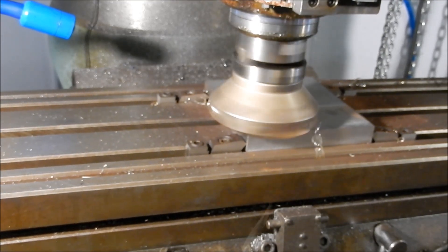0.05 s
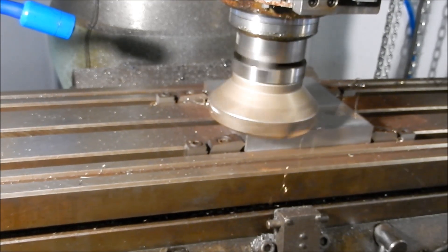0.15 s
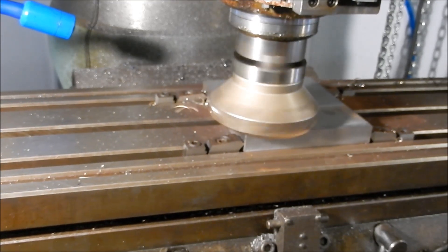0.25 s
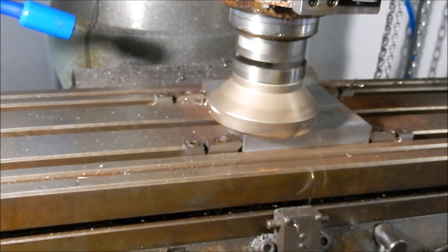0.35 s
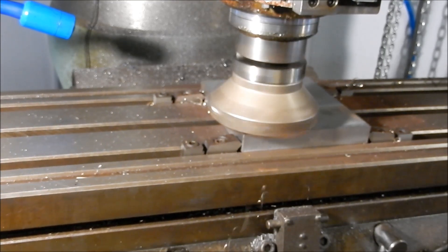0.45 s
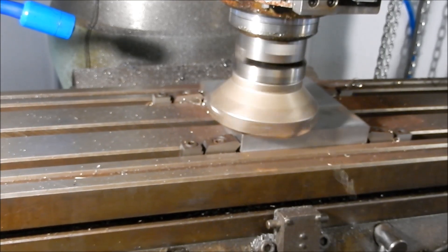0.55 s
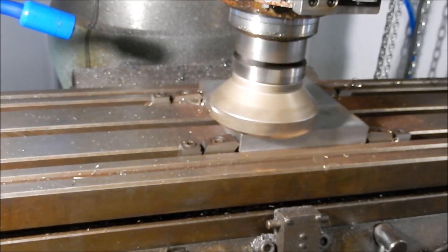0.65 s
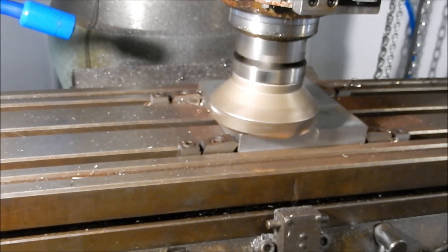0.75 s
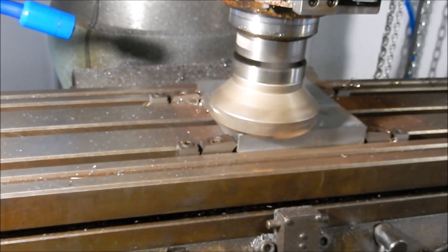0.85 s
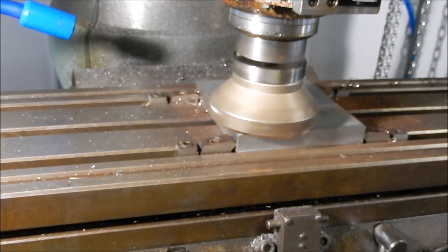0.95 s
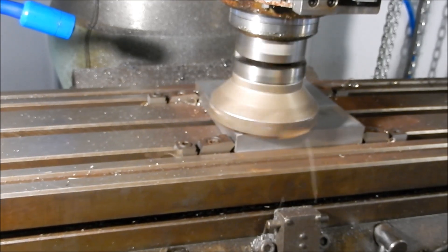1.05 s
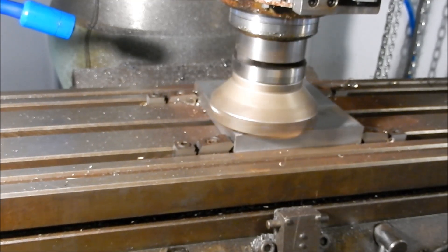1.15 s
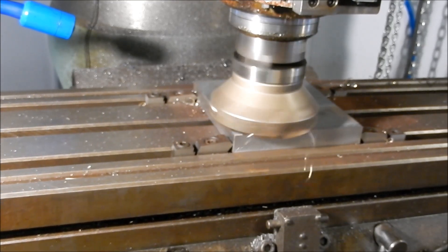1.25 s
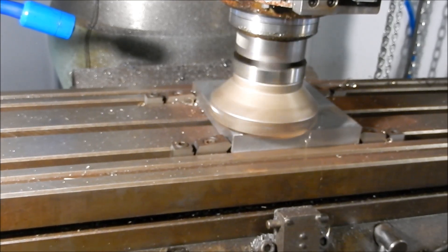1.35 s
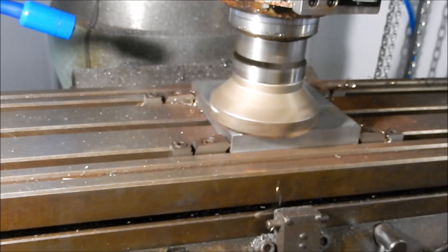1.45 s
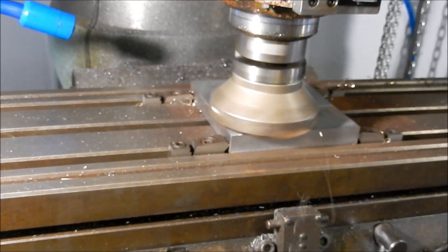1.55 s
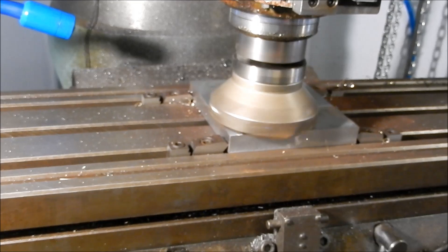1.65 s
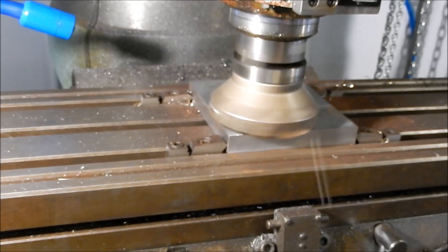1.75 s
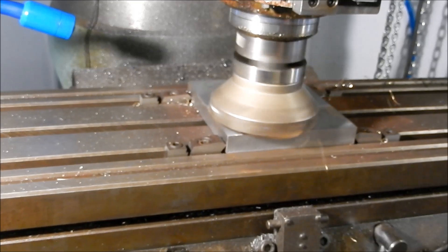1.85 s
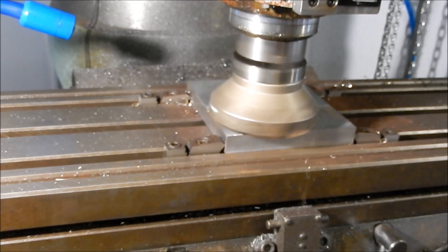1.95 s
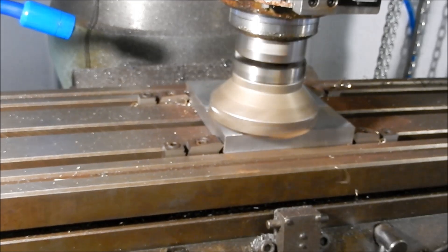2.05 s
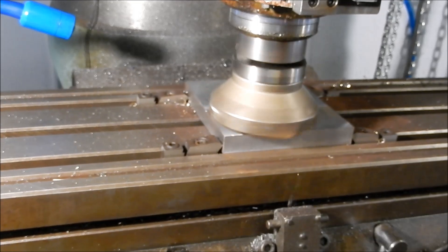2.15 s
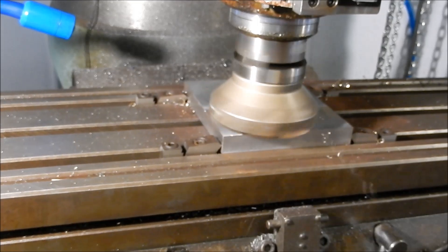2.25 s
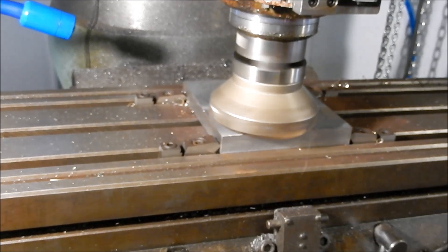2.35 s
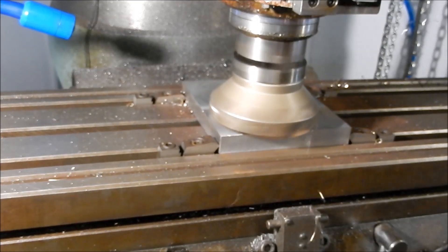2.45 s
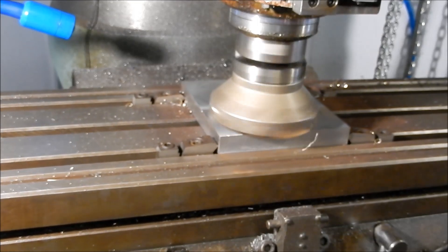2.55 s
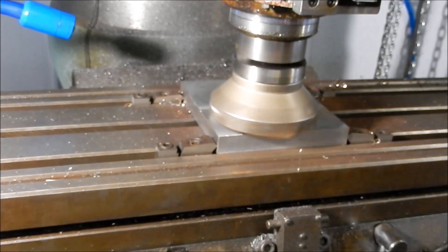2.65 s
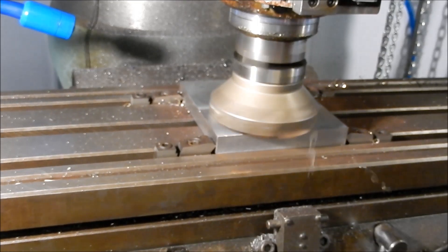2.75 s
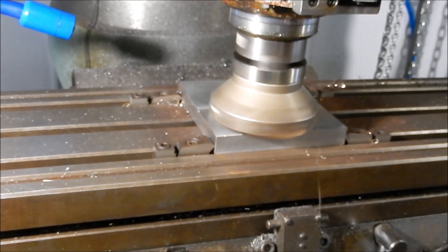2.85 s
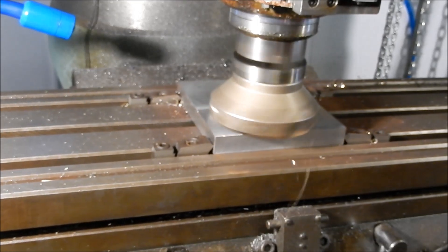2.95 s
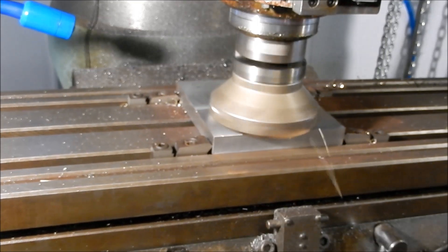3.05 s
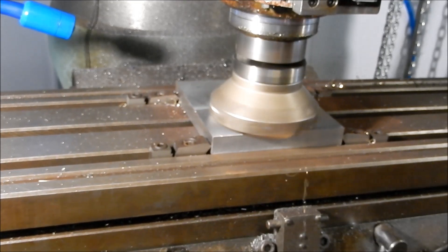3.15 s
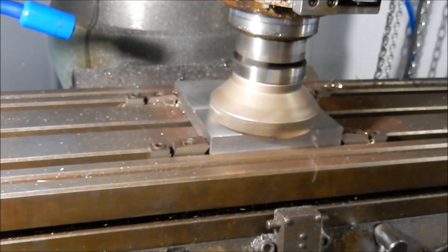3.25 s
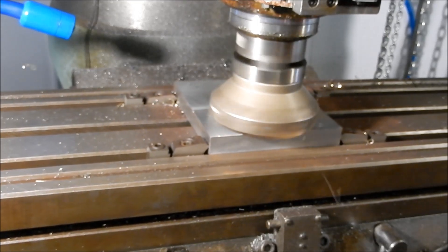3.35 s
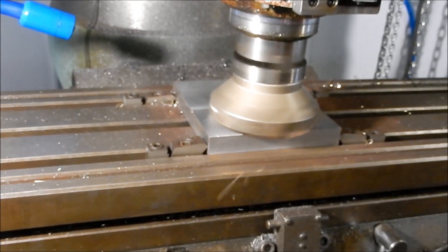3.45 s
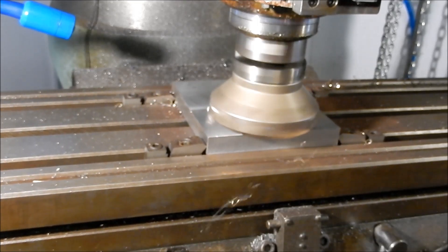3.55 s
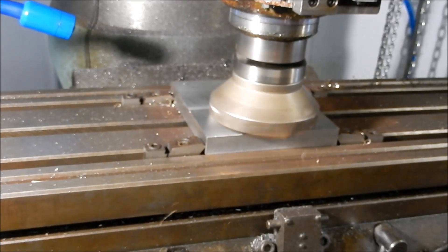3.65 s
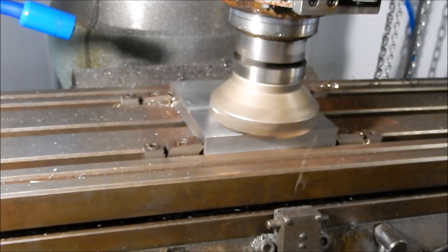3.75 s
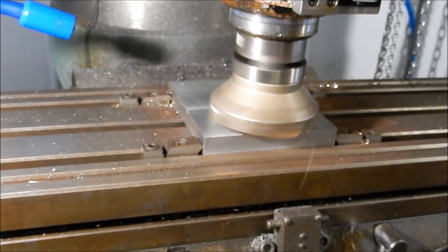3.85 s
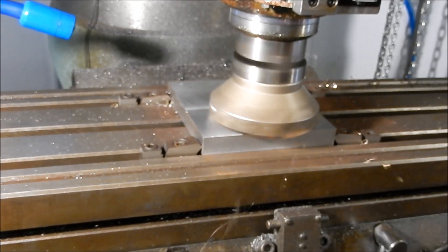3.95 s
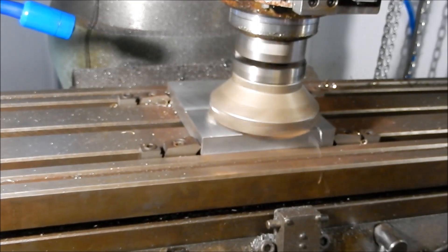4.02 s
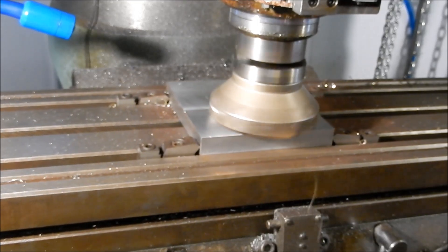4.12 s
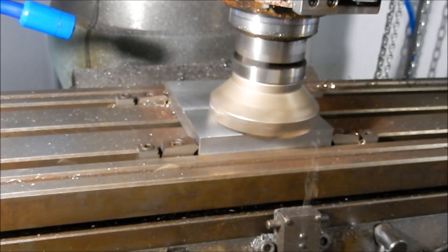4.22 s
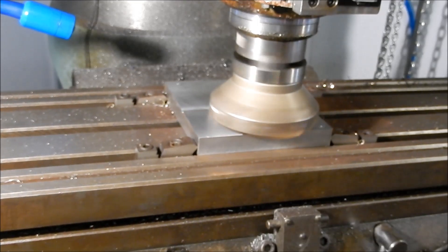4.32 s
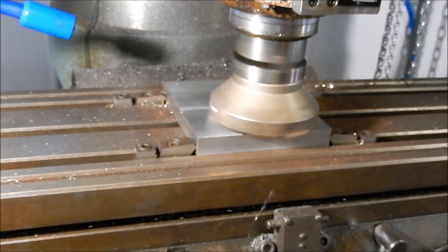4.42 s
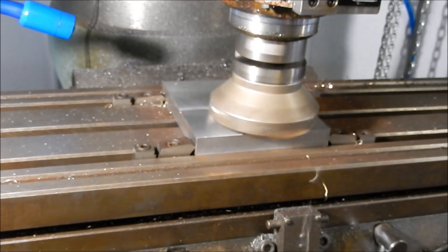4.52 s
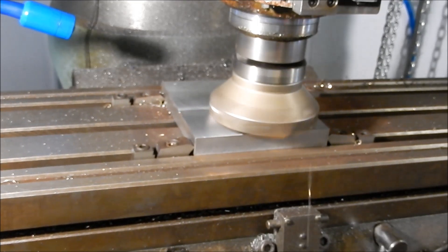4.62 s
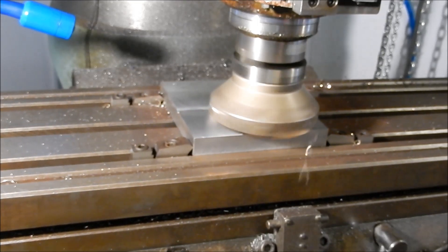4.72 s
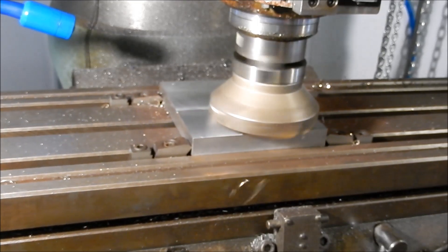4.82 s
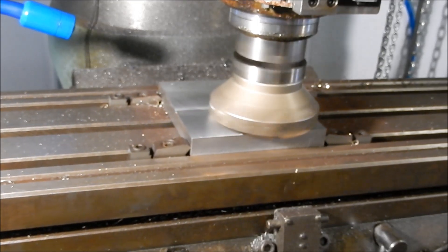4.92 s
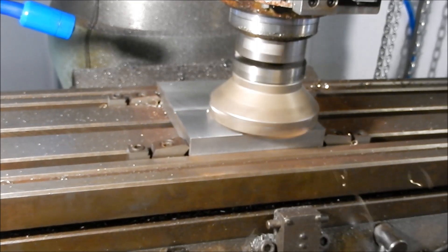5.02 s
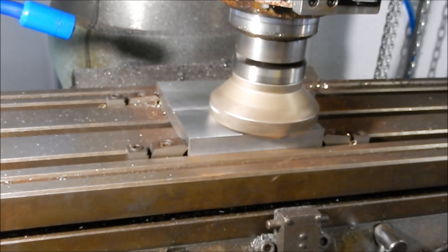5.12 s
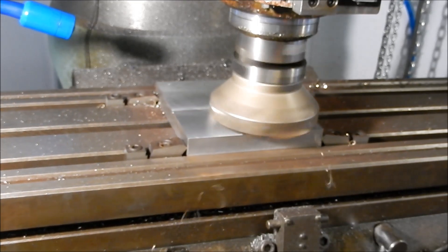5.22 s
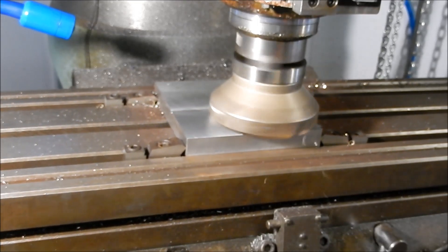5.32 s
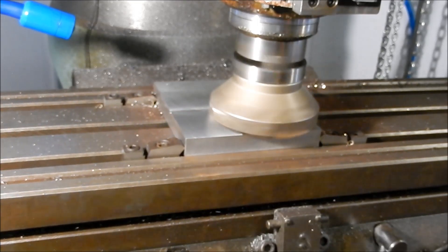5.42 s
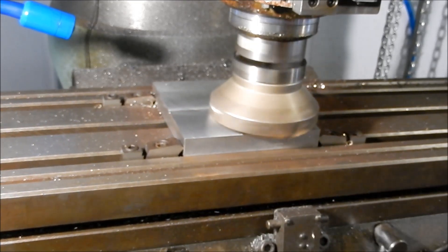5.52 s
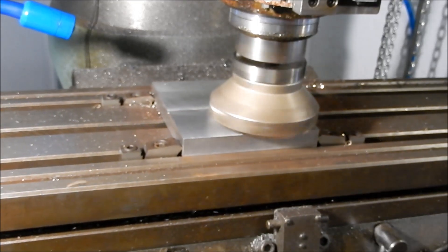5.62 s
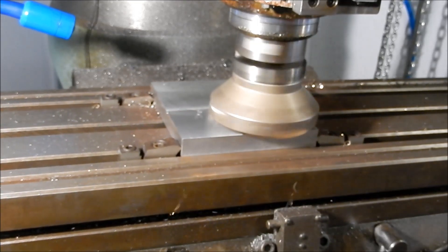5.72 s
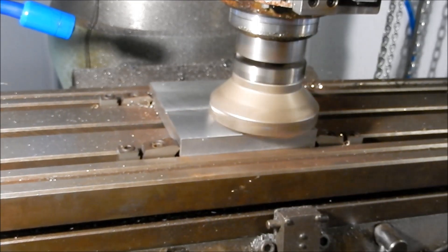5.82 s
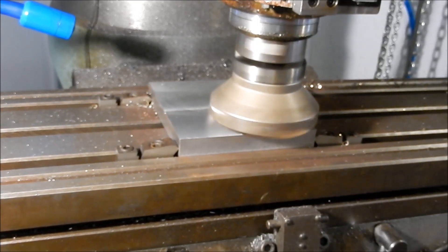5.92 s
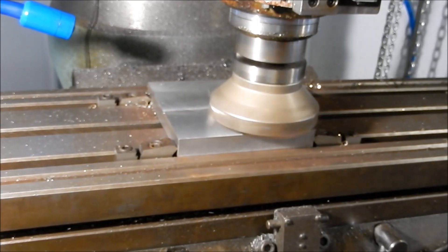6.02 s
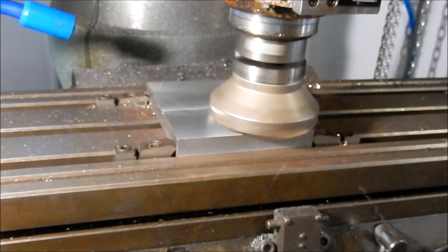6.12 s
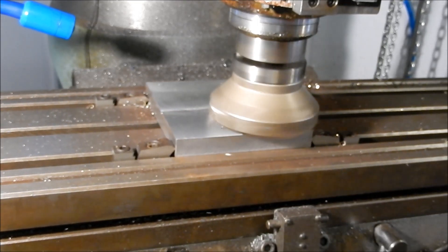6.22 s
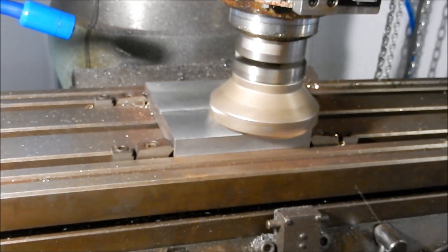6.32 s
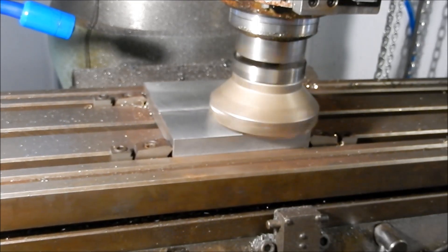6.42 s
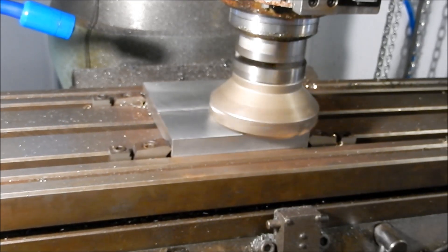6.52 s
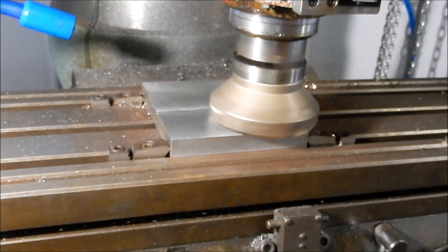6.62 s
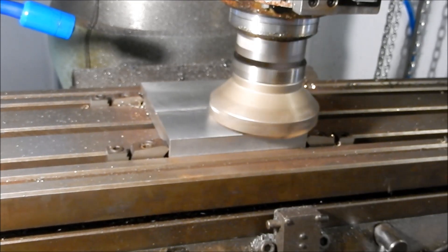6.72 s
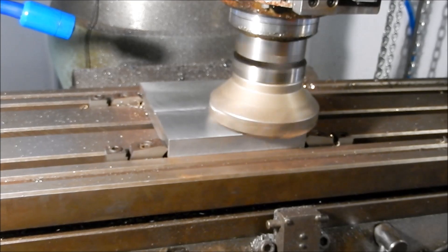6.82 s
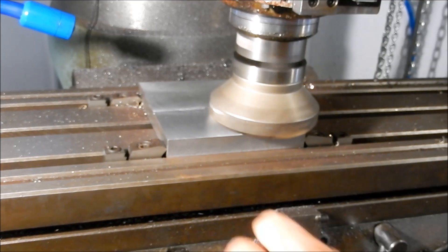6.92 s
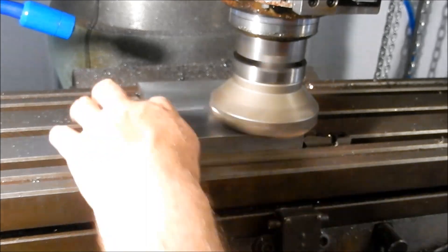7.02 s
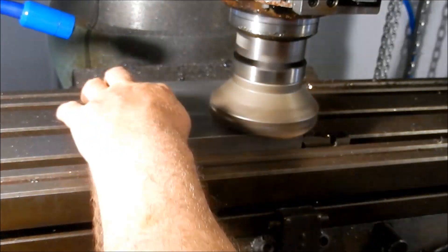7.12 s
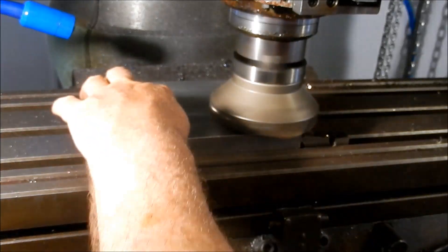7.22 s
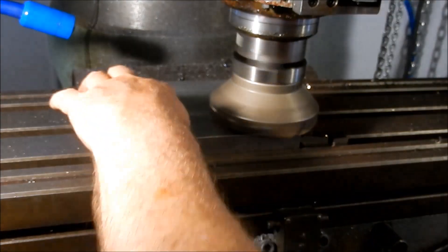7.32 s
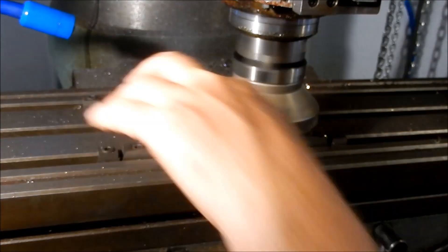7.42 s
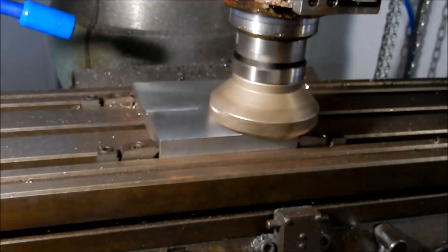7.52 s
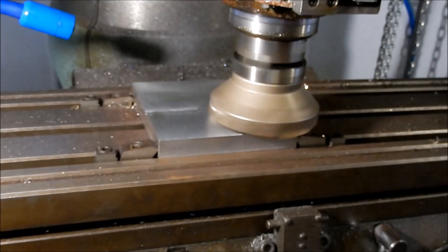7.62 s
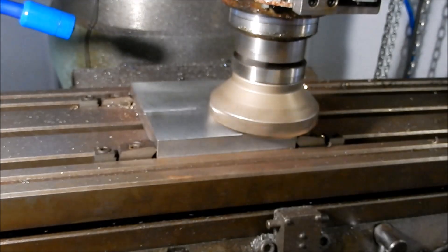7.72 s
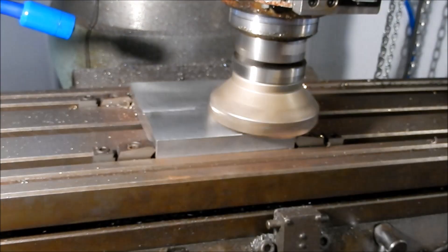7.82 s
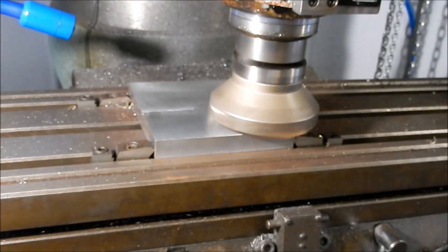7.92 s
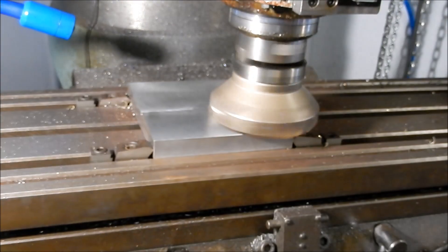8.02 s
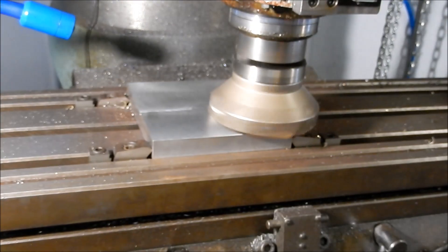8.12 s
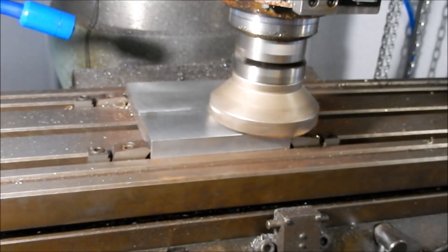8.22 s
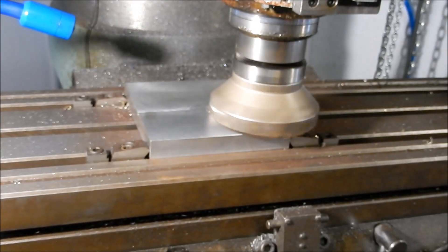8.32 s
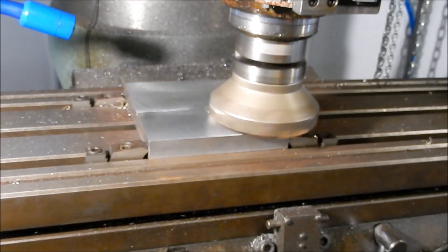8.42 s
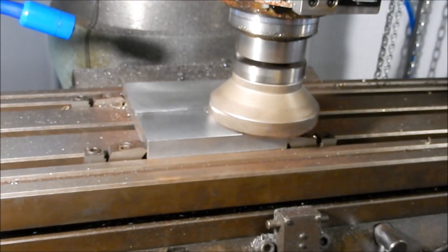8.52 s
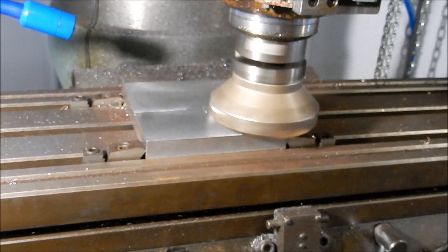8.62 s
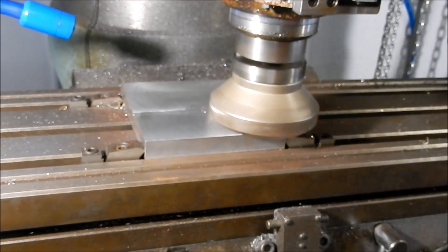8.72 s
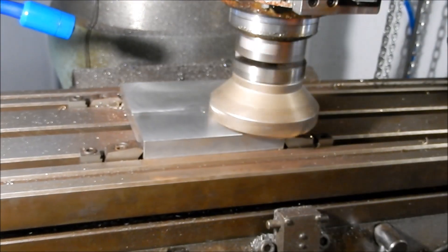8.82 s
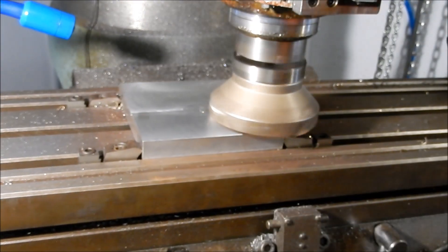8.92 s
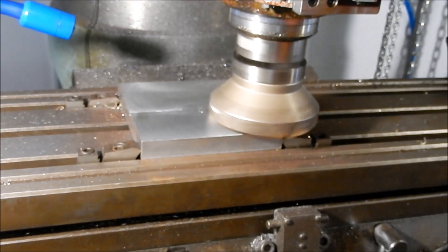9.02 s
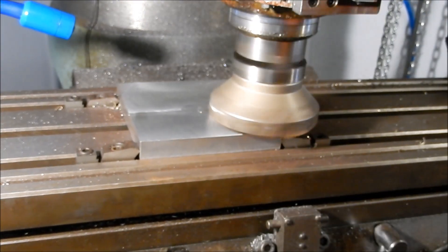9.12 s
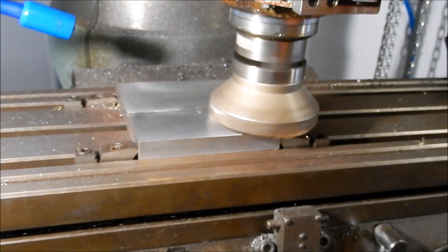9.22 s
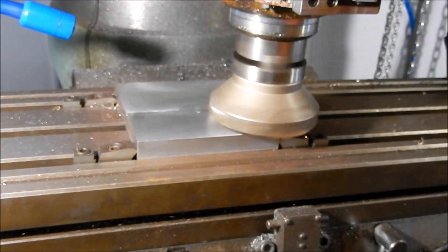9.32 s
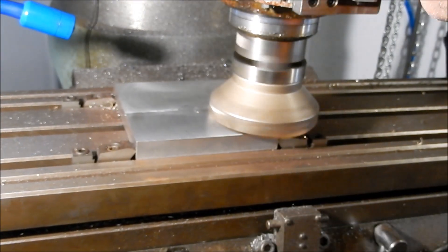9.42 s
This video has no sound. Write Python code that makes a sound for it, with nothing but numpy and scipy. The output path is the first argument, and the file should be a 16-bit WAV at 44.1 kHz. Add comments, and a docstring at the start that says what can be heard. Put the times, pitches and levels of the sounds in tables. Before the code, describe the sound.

A milling cutter holds a buzzing, ringing drone on clamped metal, under crisp hiss and fluttering scrapes. Past the middle a short squeak slides down, the pitch rises slightly and separate metallic rings swell and drop as the cut runs out. It falls to a much quieter spindle whir and airy motor rush with quick ticks. Close, nearly central pickup, little bass, workshop setting.

```python
"""A metallic ringing growl over bright chip hiss: a face mill with six inserts skims a clamped metal plate.
Multiples of the spindle speed ring in table, head and plate; shaped noise makes motor rush and chip hiss.
Once-a-turn bursts through resonances tick and scrape; some ticks come out stronger and a brief rub squeaks.
The cutter runs off the edge with flaring rings, then the spindle speeds up and idles, ticking once a turn."""
import sys
import numpy as np
from scipy import signal
from scipy.fft import rfft, irfft
from scipy.io import wavfile
from scipy.ndimage import uniform_filter1d

SR = 44100
rng = np.random.default_rng(int(sys.argv[2]) if len(sys.argv) > 2 else 0)


def digitize_waveform(pressure):
    """Quantize a signal to 16-bit integers and store it at the path in sys.argv[1].

    Rows of a 2-D input are taken as channels; values are limited to [-1, 1].
    """
    field = np.atleast_2d(pressure).T
    bounded = np.clip(field, -1, 1)
    quanta = np.round(bounded * 32767).astype(np.int16)
    wavfile.write(sys.argv[1], SR, quanta)


def rack_gain(trim_db):
    """Turn a fader trim in dB into the linear factor to multiply a signal by."""
    fader = np.asarray(trim_db, float)
    return 10 ** (fader / 20)


N = 417186
T = np.arange(N) / SR
# places in the turn (0 to 1): proud insert bites, cut is lightest, proud insert strikes at the edge
SCRAPE_AT, GAP_AT, KNOCK_AT = .69, .04, .59


def evened(x):
    """Scales to rms 1."""
    return x / np.sqrt(np.mean(x ** 2) + 1e-20)


def read(points, hz):
    """Reads a spectrum on a log frequency axis."""
    f, value = np.transpose(points)
    return np.interp(np.log(hz + 1), np.log(f + 1), value)


def curves(rows, t=T):
    """Reads every column of a table at the values t of its first column."""
    at, *columns = np.transpose(rows)
    return [np.interp(t, at, column) for column in columns]


def drift(hz, count, t):
    """Slow chance of rms 1: sines of random phase up to hz."""
    f = np.geomspace(hz / 20, hz, 16)[:, None]
    phases = rng.random((count, 16, 1))
    return np.array([evened((np.sin(2 * np.pi * (f * t + p)) / f ** 0.0092).sum(0)) for p in phases])


def resonate(x, hz, width):
    """A resonance that may glide: shifts hz down to zero, smooths twice, shifts back."""
    turn = np.exp(2j * np.pi * np.cumsum(hz * np.ones(len(x))) / SR)
    r = np.exp(-np.pi * width / SR)
    smooth = signal.lfilter([(1 - r) ** 2], [1, -2 * r, r * r], x / turn)
    return 2 * (turn * smooth).real


def ring_modes(x, modes):
    """Sums parallel resonances of one excitation, each set to its own level."""
    return sum(rack_gain(db) * evened(resonate(x, hz, width)) for hz, width, db in modes)


def rush(x, spectrum, peaks, lift_db, patchy_db):
    """Colours white noise with a smooth spectrum, resonant humps and drifting patches."""
    hz, _, z = signal.stft(x, SR, nperseg=2048, noverlap=1536)
    patches = uniform_filter1d(rng.standard_normal(z.shape), 20, 0)  # across frequency
    patches = evened(uniform_filter1d(patches, 6, 1))  # across time
    humps = sum(rack_gain(2 * (db + lift_db)) / (1 + (2 * (hz - f) / w) ** 2) for f, w, db in peaks)
    humps = humps * np.minimum(hz / 280, 1) ** 12  # keeps their skirts out of the bass
    size = np.sqrt(rack_gain(2 * read(spectrum, hz)) + humps)
    z = z * size[:, None] * rack_gain(patchy_db * patches)
    return evened(signal.istft(z, nperseg=2048, noverlap=1536)[1][:N])


def repeating(turns, share, renew_turns):
    """White noise of which a share comes back every turn, as the same edges meet alike metal; it renews slowly."""
    pattern = rng.standard_normal((200, 1300))
    age = turns / renew_turns
    row, at = age.astype(int), (turns % 1 * 1300).astype(int)
    fade = age % 1 * np.pi / 2
    back = pattern[row, at] * np.cos(fade) + pattern[row + 1, at] * np.sin(fade)
    return np.sqrt(share) * back + np.sqrt(1 - share) * rng.standard_normal(N)


def per_turn(turns, place, length, spread_db):
    """A click and a noise burst once a turn, dying over about `length` of a turn, each of its own size."""
    since = turns - place + 1
    size = rack_gain(spread_db * rng.standard_normal(400))[since.astype(int)]
    part = since % 1 / length
    click = np.diff(since // 1, prepend=since[0] // 1) > 0
    burst = part * np.exp(-part) * repeating(turns, .3, 6)
    return evened(size * (2.8 * click + burst))


def levels(contact):
    """Table, head and plate ring, chip hiss and insert scrape follow the contact, plus brief swells and dips."""
    # what sounds: (inserts_fully_in_db, grazing_edge_db, clear_db), relative levels
    contact_levels = {"table": (-54, -48.5, -62), "head": (-39.5, -40.5, -53.5), "plate": (-41, -38, -56),
                      "hiss": (-44, -40.5, -55), "scrape": (-63.5, -62.5, -75)}
    # brief swells and dips: (centre_s, half_length_s, what sounds, change_db)
    brief_swells = [(.7, 1.3, "scrape", -2.5), (5.39, .1, "plate", -3.5), (5.477, 0.042, "head", 1.5),
                    (5.534, 0.075, "table", 7), (5.595, 0.049, "head", -8), (5.745, 0.078, "table", -5),
                    (5.75, 0.12, "plate", -1.5), (5.964, 0.12, "head", -14), (5.955, 0.051, "plate", 0.5),
                    (6.056, 0.04, "plate", -3), (6.25, 0.069, "head", -7.5), (6.35, 0.17, "scrape", 8.5),
                    (6.098, 0.063, "scrape", 1), (5.577, 0.086, "hiss", 3.5), (5.678, 0.025, "hiss", 3),
                    (6.13, 0.019, "hiss", 3), (5.83, 0.025, "plate", -1.5), (5.622, .06, "plate", -1),
                    (6.35, 0.061, "plate", -9), (6.602, 0.11, "head", -12.5), (6.6, 0.15, "table", -3),
                    (6.733, 0.036, "table", -6), (6.87, 0.071, "plate", -2), (7.216, 0.18, "table", 8.5),
                    (7.22, 0.13, "head", -3), (7.7, 0.19, "plate", -14), (8.023, 0.15, "head", -4),
                    (8.07, .1, "plate", -5), (8.318, 0.51, "table", 9.5), (8.925, 0.058, "table", 14),
                    (9.084, 0.11, "plate", 3), (9.106, 0.17, "table", -24), (9.46, 0.13, "table", 10.5),
                    (9.46, .12, "head", 0)]
    swell = {part: np.zeros(N) for part in contact_levels}
    for s, half, part, db in brief_swells:
        swell[part] += db * np.exp(-((T - s) / half) ** 2)
    swell["hiss"] += 0.25 * swell["head"]  # the hiss shares a quarter of the head's changes
    return [np.interp(contact, [0, 1, 2], contact_levels[part]) + swell[part] for part in contact_levels]


def order_levels(k):
    """dB of every order in full cut, leaving and idle: a scattered line, with some orders set by hand."""
    # the line all other orders scatter about: (order, full_cut_db, leaving_db, idle_db)
    weak_orders = [(5, -82, -85, -95), (10, -80, -79, -84), (15, -67, -66, -76), (20, -70, -72, -84),
                   (28, -69, -69, -82), (44, -64, -63, -74), (55, -59, -63, -74), (59, -68, -64, -76),
                   (80, -75, -78, -82)]
    # orders set by hand, most above the line, a few below, before rings are balanced:
    # (order, full_cut_db, leaving_db)
    set_orders = [(5, -78, -84), (6, -72, -70), (7, -83, -83), (9, -71, -78), (12, -56, -55),
                  (13, -58, -56), (14, -76, -57), (15, -62, -60), (18, -58, -63), (19, -67, -56),
                  (21, -62, -58), (22, -50, -53), (23, -47, -50), (24, -42, -49), (25, -59, -68),
                  (29, -55, -60), (30, -56, -54), (31, -58, -69), (35, -58, -57), (36, -45.5, -64),
                  (39, -52, -64), (41, -60, -60), (42, -56, -58), (43, -64, -57), (44, -72, -62),
                  (46, -57, -50), (47, -60, -51), (48, -52, -42), (49, -53, -53), (50, -58, -56),
                  (51, -43.5, -54), (52, -52, -52), (53, -53, -54), (54, -45.5, -46), (55, -59, -62),
                  (56, -58, -62), (57, -53, -65), (63, -58, -61), (65, -59, -62), (67, -59, -63),
                  (69, -57.5, -65), (70, -61, -68), (77, -60, -70), (78, -60, -70)]
    # orders still heard at idle: (order, idle_db)
    idle_orders = [(13, -67), (14, -58), (15, -65), (23, -68), (24, -55), (25, -70), (46, -66), (47, -66),
                   (48, -64), (61, -64)]
    scatter_db = 3.5
    db = np.transpose(curves(weak_orders, k)) + scatter_db * rng.standard_normal((len(k), 3))
    for n, cut_db, leaving_db in set_orders:
        db[k == n, :2] = cut_db, leaving_db
    for n, idle_db in idle_orders:
        db[k == n, 2] = idle_db
    return db


def burst_phases(k):
    """Start phases: in full cut each group of orders bursts at its own place, at the edge all near the blow."""
    # neighbouring orders that ring together: (first_order, last_order, place_turns, later_turns_per_order)
    order_bursts = [(27, 32, .75, .04), (33, 41, .47, .02), (42, 45, .2, -.03), (46, 48, .59, -.28),
                    (49, 51, .9, -.17), (52, 54, .43, .24), (55, 56, .87, -.03), (57, 58, .5, .2)]
    place = rng.random(len(k))
    for first, last, at, later in order_bursts:
        place = np.where((k >= first) & (k <= last), at + later * (k - first), place)
    cut = -2 * np.pi * np.cumsum(place - GAP_AT)
    edge = -2 * np.pi * np.cumsum(KNOCK_AT - GAP_AT + .2 * rng.standard_normal(len(k)))
    return cut, edge


def knock(turns, stage):
    """At the edge only the proud insert strikes: the plate swells once a turn and sags between blows."""
    depth = .12 * np.interp(stage, [.2, .8, 1.3, 1.8], [0, 1, 1, 0])
    return (1 + depth * np.cos(2 * np.pi * (turns - KNOCK_AT))) / np.sqrt(1 + depth ** 2 / 2)


def orders(turns, stage, ring_db):
    """The cutting force repeats each turn, so it sounds as wavering multiples of the spindle speed."""
    # table, head and plate ring: (first_order, last_order)
    ring_orders = [(11, 16), (21, 25), (41, 57)]
    # balance changes during the full cut: (order, from_s, over_s, change_db)
    order_fades = [(51, 5.5, .02, -22), (54, 0.5, 4.9, -7), (36, 0, 2.6, -3), (48, -6, 1, 0)]
    # single orders flare or drop out as the edge arrives: (centre_s, half_length_s, order, change_db)
    order_flares = [(5.36, 0.19, 46, 8), (5.4, .1, 52, -9), (5.45, 0.071, 23, 1), (5.453, 0.076, 22, -2),
                    (5.536, 0.029, 36, 11), (5.65, 0.071, 30, 12.5), (5.62, 0.053, 23, -8),
                    (5.62, .06, 64, 16), (5.62, 0.055, 66, 16), (5.616, 0.076, 45, 10),
                    (5.75, 0.1, 29, 9.5), (5.767, .09, 51, -5), (5.76, 0.096, 54, -11),
                    (5.77, 0.11, 41, 9.5), (5.94, 0.058, 48, 4.5), (6.2, 0.11, 48, 3),
                    (6.205, 0.092, 54, 3.5), (6.402, 0.32, 19, 6.5), (6.19, .08, 29, 2),
                    (6.52, 0.15, 42, 12.5), (6.52, .13, 43, 4), (6.52, .12, 13, -16), (6.52, .12, 50, -9)]
    stroke_db = .9  # each ring is struck a little harder or softer as the spindle turns
    thump_at = .58  # place in the turn where the table rings most
    waver_db, waver_rad = 1.0, .2  # at order 40 in full cut
    t, slow_stage = T[::256], stage[::256]
    k = np.arange(5, 81)
    leaving = np.clip(slow_stage, 0, 1)

    db = np.array([np.interp(slow_stage, [0, 1, 2], row) for row in order_levels(k)])
    for n, s, over, fade_db in order_fades:
        db[k == n] += fade_db * np.clip((t - s) / over, 0, 1) * (1 - leaving)
    # each ring's orders together take on the level of that ring
    for (first, last), level in zip(ring_orders, ring_db):
        ring = (k >= first) & (k <= last)
        stroke = stroke_db * drift(18, count=1, t=t)[0]
        db[ring] += level[::256] + stroke - 10 * np.log10(rack_gain(2 * db[ring]).sum(0))
    for s, half, n, flare_db in order_flares:
        db[k == n] += flare_db * np.exp(-((t - s) / half) ** 2)

    loose = (k[:, None] / 40) ** 1.5  # high orders feel small speed errors more
    # they waver more while leaving the edge, and every order wavers more without load
    loose = loose * np.interp(slow_stage, [0, .3, .55, .75, 1, 2], [1, 1.8, 3.6, 1.8, 1.8, 1])
    loose = loose + .5 * np.clip(slow_stage - 1, 0, 1)
    db += waver_db * loose * drift(14, len(k), t)

    cut, edge = burst_phases(k)
    # in the head ring the side orders cancel the tooth order once a turn, where the cut is lightest
    side = np.pi + np.interp(k, [21, 22, 23, 25], [2.1, -.55, .55, -.8])
    start = np.where(abs(k - 23) < 3, (k % 6 > 0) * side, cut)
    # low orders throb in a sweep
    sweep = 2 * np.pi * k * (GAP_AT - thump_at) - .6 * (k - 12.5) ** 2
    start = np.where(k < 17, sweep, start)
    above_head = k > ring_orders[1][1]
    shift = above_head * np.angle(np.exp(1j * (edge - start)))
    phase = start[:, None] + shift[:, None] * leaving
    phase = phase + waver_rad * loose * drift(12, len(k), t)

    struck = knock(turns, stage)
    out = np.zeros(N)
    for n, level, p, high in zip(k, db, phase, above_head):
        tone = np.cos(2 * np.pi * n * (turns - GAP_AT) + np.interp(T, t, p))
        out += (struck if high else 1) * np.interp(T, t, rack_gain(level)) * tone
    return np.sqrt(2) * out


def chips(turns, hiss_db):
    """Hiss of metal shearing, swelling as each of six inserts enters and once a turn for the proud one."""
    # smooth hiss spectrum: (frequency_hz, relative_density_db)
    hiss_spectrum = [(100, -62), (170, -40), (450, -15), (640, -19), (800, -10), (900, -14), (1150, -16),
                     (1450, -14), (1620, -8), (1780, -6), (1950, -7), (2100, -12), (2300, -10), (2550, -14),
                     (3000, -15), (5000, -20), (8000, -24), (16000, -36)]
    # resonances in the hiss: (frequency_hz, width_hz, level_db before the common lift)
    cutter_modes = [(3340, 22, 0), (3706, 39, -1), (5770, 310, -7.5), (6740, 86, -5), (7300, 570, -10),
                    (8830, 60, -7.5), (9500, 100, -11.5), (11750, 400, -16.5), (12850, 120, -13),
                    (15200, 180, -37), (16100, 130, -16)]
    bite = turns - SCRAPE_AT
    teeth = 1 + .15 * np.cos(2 * np.pi * 6 * bite) + .2 * np.cos(2 * np.pi * bite)
    shear = rush(repeating(turns, .4, 8), hiss_spectrum, cutter_modes, lift_db=-8.5, patchy_db=1.4)
    flicker_db = 0.91 * drift(40, count=1, t=T)[0]
    return rack_gain(hiss_db + flicker_db) * teeth * shear


def motor(turns):
    """Motor and bearing rush; bearing balls passing a rough spot make the middle treble throb."""
    # smooth rush spectrum: (frequency_hz, relative_density_db)
    motor_spectrum = [(71, -69), (125, -29.5), (200, -20), (378, -17), (493, -2), (660, -12.5), (839, -5),
                      (930, -5), (1980, -5), (2930, -14), (5520, -15), (5990, -22), (6770, -21),
                      (16000, -27.5)]
    # resonances in the rush: (frequency_hz, width_hz, level_db before the common lift)
    housing_modes = [(321.6, 7.3, -4.5), (1033, 5.1, 4), (1640, 42, -7), (1945, 31, 1), (2207, 38, 1),
                     (2260, 76, -6.5), (3280, 100, -9), (5410, 170, -10), (6920, 460, -14.5),
                     (10500, 280, -19), (13800, 300, -26), (15200, 180, -16.5), (15600, 180, -22)]
    ball_hz = 93.1
    x = rush(repeating(turns, 0.057, 8), motor_spectrum, housing_modes, lift_db=0.091, patchy_db=1.7)
    throb = np.cos(2 * np.pi * ball_hz * T + 0.27 * drift(3.9, count=1, t=T)[0])
    return rack_gain(-45.5) * (x + 0.31 * throb * resonate(x, 5000, 6900))


def scrape(turns, stage, scrape_db):
    """The proud insert scrapes once a turn while it cuts: a short burst rings its resonances."""
    # scrape resonances: (frequency_hz, width_hz, relative_level_db)
    scrape_modes = [(2200, 560, -23), (3390, 290, 3.5), (5670, 460, 7), (11910, 330, 4.5), (8900, 6900, 4)]
    wander_db = 1.5 * drift(2, count=1, t=T)[0]
    burst = per_turn(turns, SCRAPE_AT, length=.016, spread_db=1.2)
    cutting = np.clip(2 - stage, 0, 1)
    return cutting * rack_gain(scrape_db + wander_db - 4.0) * ring_modes(burst, scrape_modes)


def ticks(turns):
    """The spindle ticks once a turn: a short burst rings fixed resonances and a gliding whistle on top."""
    # place of the tick: (time_s, place_turns)
    tick_place = [(0, .13), (6.5, .13), (6.8, .08), (9.46, .22)]
    # tick loudness: (time_s, level_db before the trim)
    tick_level = [(0, -57.5), (2.7, -63), (3.15, -73), (3.6, -69.5), (4.3, -70), (4.95, -56), (5.4, -73.5),
                  (5.75, -58), (6.3, -67), (6.7, -54.5), (7.0, -60), (7.5, -64), (7.9, -56.5), (8.6, -59),
                  (9.46, -59)]
    # top of the tick: (time_s, pitch_hz, level_db before the trim)
    whistle = [(0, 13200, -88), (1.6, 12800, -57), (3.0, 12500, -63), (4.3, 13700, -68), (5.0, 13750, -66),
               (6.5, 12850, -68), (6.9, 13700, -70), (9.05, 13660, -66), (9.3, 13800, -59),
               (9.46, 14000, -58)]
    # tick resonances: (frequency_hz, width_hz, relative_level_db)
    tick_modes = [(7110, 420, 0), (8000, 300, -7), (8800, 300, -7), (9880, 320, 3), (11230, 380, -8),
                  (9000, 7000, 1)]
    (place,), (tick_db,) = curves(tick_place), curves(tick_level)
    whistle_hz, whistle_db = curves(whistle)
    burst = per_turn(turns, place, length=.022, spread_db=1.8)
    body = rack_gain(tick_db - 7.0) * ring_modes(burst, tick_modes)
    return body + rack_gain(whistle_db - 1.5) * evened(resonate(burst, whistle_hz, 300))


def strong_ticks():
    """Some spindle ticks come out stronger: short bright clicks, each a dying sine with a puff of noise."""
    # single strong ticks: (start_s, level_db before the trim, ring_hz)
    single_ticks = [(0.504, -21, 4230), (0.971, -16, 3520), (1.0295, -37, 3220), (1.062, -16, 5600),
                    (1.117, -15, 3360), (1.674, -19, 3220), (5.678, -19, 5430), (6.1155, -36, 3280),
                    (6.4871, -38, 3550), (8.4607, -23, 5550)]
    out, t = np.zeros(N), np.arange(600) / SR
    for s, db, hz in single_ticks:
        ring = np.sin(2 * np.pi * hz * t) * rack_gain(-60 * t / 0.025)
        puff = 1.3 * np.gradient(rng.standard_normal(600)) * rack_gain(-60 * t / 0.014)
        out[round(s * SR):][:600] += rack_gain(db - 21.0) * (ring + puff)
    return out


def squeaks():
    """A brief rub whose pitch slides down: noise through a narrow gliding resonance."""
    # falling squeaks: (start_s, length_s, from_hz, to_hz, level_db before the fade in and out)
    rubs = [(5.124, .07, 1600, 1400, -49), (6.85, .1, 1300, 980, -51)]
    out = np.zeros(N)
    for s, length, from_hz, to_hz, db in rubs:
        n = round(length * SR)
        rub = resonate(rng.standard_normal(n), np.linspace(from_hz, to_hz, n), 60)
        out[round(s * SR):][:n] += rack_gain(db) * evened(rub) * np.hanning(n)
    return out


def two_sides(mid):
    """A scattered, dying copy is added to the left and taken from the right, so the sides differ a little."""
    # left-right likeness: (frequency_hz, likeness from 0 to 1)
    likeness = [(60, .995), (130, 0.98), (290, 1), (640, 0.98), (1410, 1), (3100, 0.92), (6820, 0.93),
                (15000, 0.96)]
    # left-right balance: (frequency_hz, left_over_right_db)
    side_lean = [(110, 2), (200, -0.5), (380, 3), (700, 1.3), (1290, 2), (2380, 1.5), (4400, 2), (8120, 1),
                 (15000, -1)]
    n = np.arange(9000)
    taps = rng.choice([-1., 1.], 9000) * (rng.random(9000) < .05) * rack_gain(-60 * n / SR / 0.14)
    walls = signal.oaconvolve(mid, taps / np.linalg.norm(taps))[:N]
    hz = np.fft.rfftfreq(N, 1 / SR)
    apart = np.sqrt((1 - read(likeness, hz)) / 2) * rfft(walls)
    lean_db = read(side_lean, hz) / 2
    middle = rfft(mid)
    return irfft([(middle + apart) * rack_gain(lean_db), (middle - apart) * rack_gain(-lean_db)], N)


def scene():
    """All sources sit at the cutter and are mixed, then spread to two sides."""
    # spindle speed, sagging under load: (time_s, speed_turns_per_s)
    spindle_speed = [(0, 34.13), (.8, 34.124), (1.6, 34.053), (2.0, 33.977), (2.7, 34.011), (3.8, 34.02),
                     (5.0, 34.036), (5.4, 33.998), (5.6, 34.387), (5.8, 34.83), (6.1, 34.955),
                     (6.5, 35.112), (7.0, 35.264), (7.5, 35.248), (9.46, 35.249)]
    # balance of the orders: (time_s, stage: 0 full cut, 1 leaving the edge, 2 idle)
    cut_stage = [(0, 0), (5.27, 0.07), (5.33, 0.05), (5.52, 0.06), (5.62, 0.5), (6.55, 1.23), (6.85, 1.5),
                 (9.46, 2.5)]
    # hold on the plate: (time_s, contact: 0 inserts fully in, 1 grazing the edge, 2 clear)
    insert_contact = [(0, 0.27), (5.45, 0.11), (5.9, 1.02), (6.6, 1.05), (6.85, 1.96), (9.46, 2.63)]
    turns = np.cumsum(curves(spindle_speed)[0]) / SR
    (stage,), (contact,) = curves(cut_stage), curves(insert_contact)
    *ring_db, hiss_db, scrape_db = levels(contact)
    mid = orders(turns, stage, ring_db) + chips(turns, hiss_db) + motor(turns)
    mid += scrape(turns, stage, scrape_db) + ticks(turns)
    mid += strong_ticks() + squeaks()
    return two_sides(mid)


def low_pass(x):
    """Removes everything above the highest recorded frequency."""
    return signal.sosfilt(signal.butter(12, 16180, fs=SR, output="sos"), x)


def record(dry):
    """A small microphone thins the bass and cuts the top sharply."""
    # microphone band edges: [low_hz, high_hz]
    low_hz, high_hz = [140, 15760]
    x = signal.sosfilt(signal.butter(2, low_hz, "high", fs=SR, output="sos"), dry)
    x = signal.sosfilt(signal.ellip(12, .1, 70, high_hz, fs=SR, output="sos"), x)
    return low_pass(x)


dry = scene()
out = record(dry)
digitize_waveform(out)
```